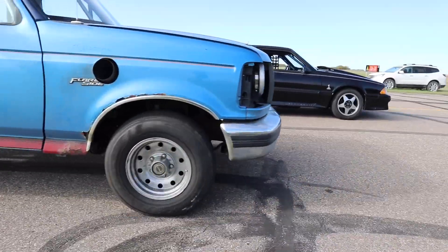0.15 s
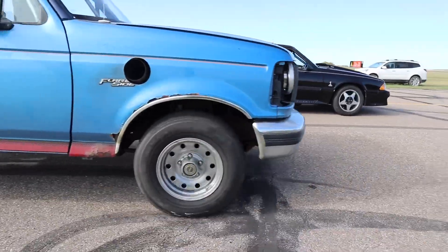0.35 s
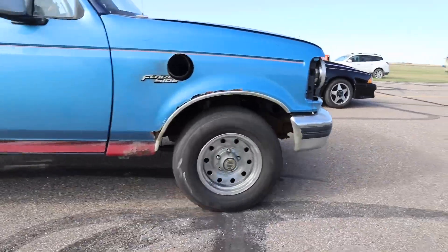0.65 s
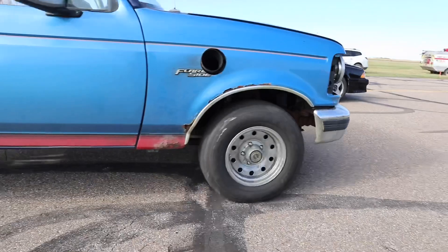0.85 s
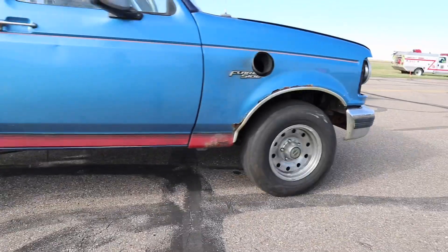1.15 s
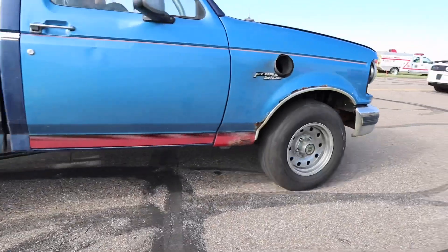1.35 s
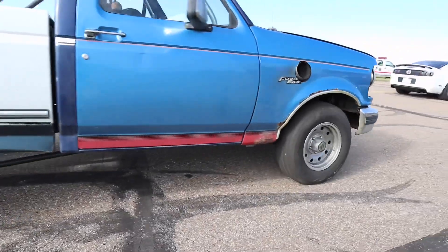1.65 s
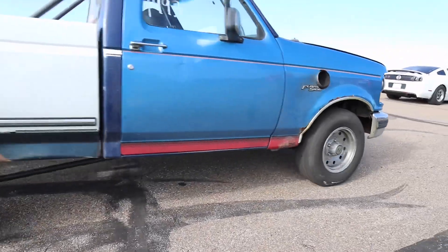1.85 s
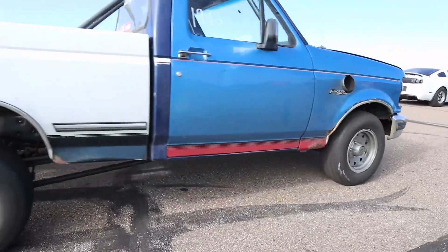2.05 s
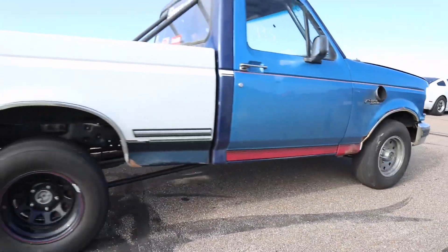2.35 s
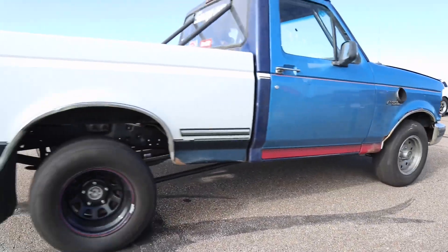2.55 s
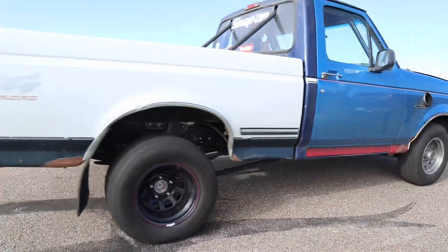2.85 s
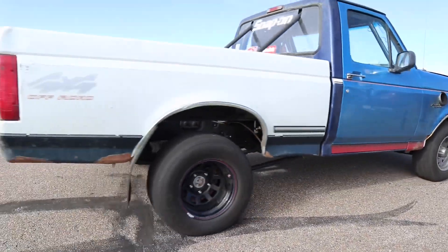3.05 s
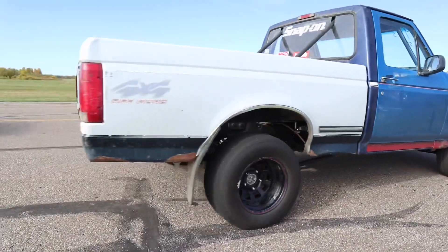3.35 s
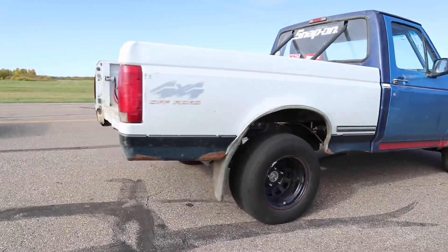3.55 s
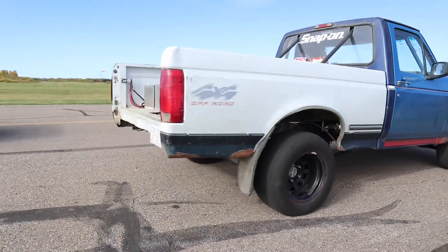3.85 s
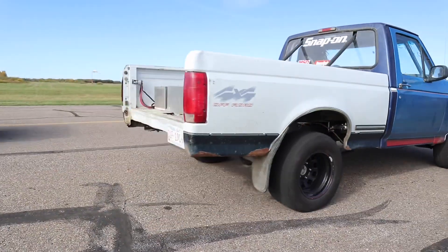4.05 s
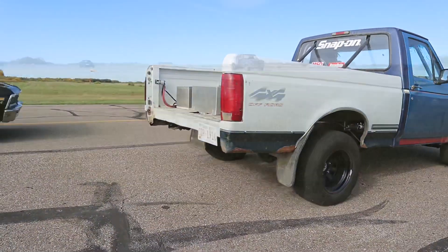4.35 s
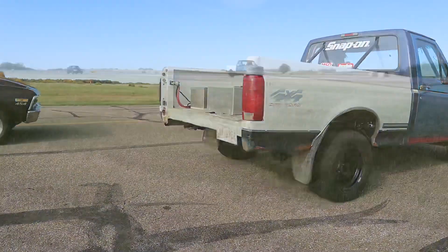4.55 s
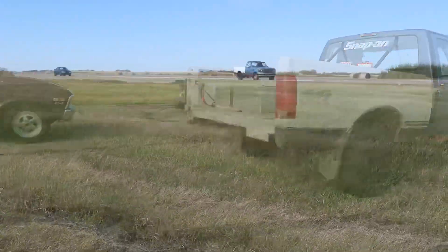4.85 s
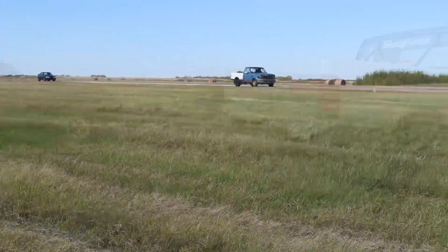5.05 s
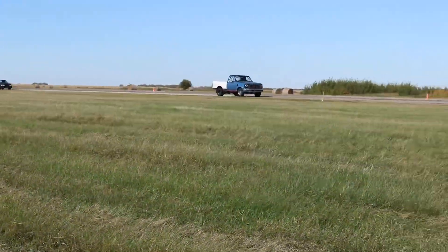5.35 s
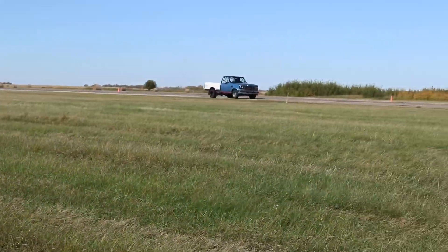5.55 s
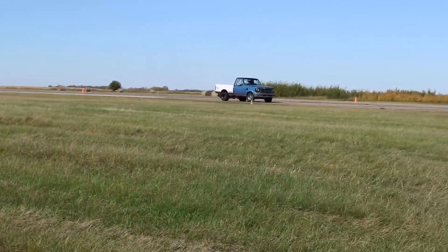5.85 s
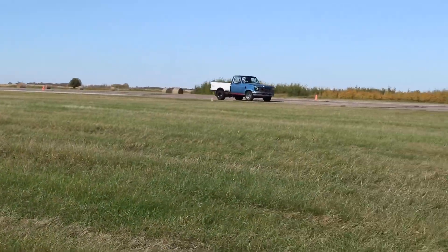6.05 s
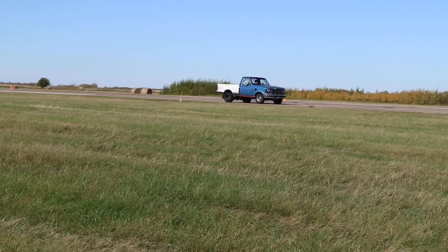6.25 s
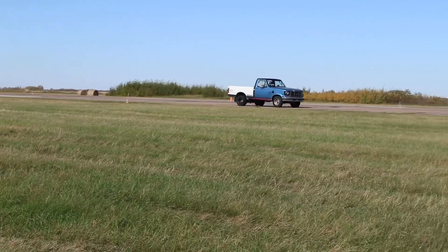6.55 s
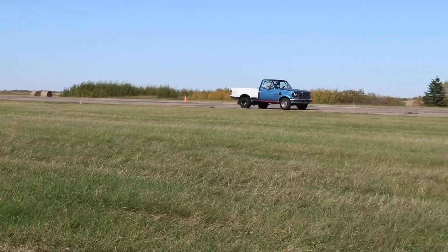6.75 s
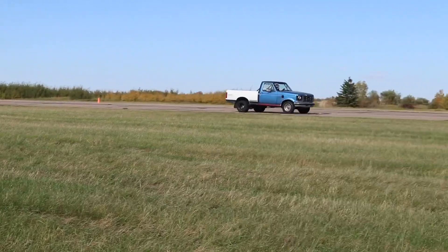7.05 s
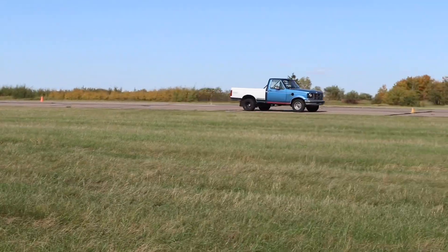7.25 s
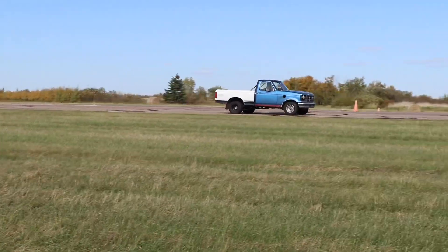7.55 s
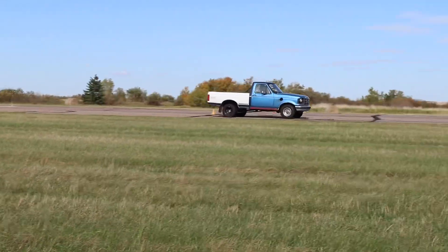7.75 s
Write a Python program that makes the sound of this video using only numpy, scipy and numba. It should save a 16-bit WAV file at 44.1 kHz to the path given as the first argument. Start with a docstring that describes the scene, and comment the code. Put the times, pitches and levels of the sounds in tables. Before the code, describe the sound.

Outdoors on open tarmac, a V8 pickup crawls past the microphone at a lumpy idle, deep exhaust booming and barking over ticking valves and fan hiss. From behind it grows throatier, then briefly labours and sags with a sizzle. The sound crossfades to the truck far away across grass, droning steadily under load and nearing, its rushing treble swelling and sinking while wind buffets and pops the microphone. A few dry cracks snap out.

```python
"""A V8 pickup rolls past close by at a lumpy fast idle: its firings boom and bark, mirrored by the road.
As it rolls away its engine labours briefly and sags, in a swell of open exhaust notes, clatter and sizzle.
The sound fades into the same truck far down the track, pulling hard and coming closer over the grass:
steady exhaust notes drone under a rush of filtered noise whose treble swells and sinks.
Gusts of noise then buffet and pop the microphone; a few sharp cracks stand out from the labouring onwards."""
import sys
import numpy as np
from scipy import signal
from scipy.fft import rfft, irfft, next_fast_len
from scipy.io import wavfile
from scipy.ndimage import uniform_filter1d, map_coordinates
from numba import njit

SR = 44100
rng = np.random.default_rng(int(sys.argv[2]) if len(sys.argv) > 2 else 0)


def master(y):
    """Save y as 16-bit WAV."""
    cut = np.clip(np.atleast_2d(y).T, -1, 1)
    pcm = np.round(cut * 32767)  # scale
    wavfile.write(sys.argv[1], SR, pcm.astype(np.int16))


N = 347939

# engine speed while rolling by, then while pulling: (time [s], engine cycles per second [Hz])
IDLE_SPEED = [(0, 9.48), (.75, 9.48), (1, 8.93), (1.3, 8.34), (1.8, 8.49), (2.4, 9.18), (2.8, 8.95),
              (3.2, 8.49), (3.6, 8.64), (3.85, 8.38), (4.15, 7.62), (4.5, 7.22)]
PULL_SPEED = [(4.7, 25.65), (5.8, 25.73), (6.1, 25.46), (6.3, 24.7), (6.42, 24.5), (6.62, 24.3),
              (7.36, 23.9), (7.89, 23.38)]
# exhaust notes at idle, and those of the open pipe mouth: (multiple of the cycle rate, relative level [dB])
IDLE_NOTES = [(5, -7), (6, -36), (7, -32), (8, 2.5), (9, -24), (10, -17), (11, 0), (12, -16), (13, -0.5),
              (14, -10.5), (15, -30), (16, -3.5), (17, -10), (18, -16), (19, -8), (20, -8), (21, -4),
              (22, -29.5), (25, -15.5), (26, -24), (27, -16.5)]
MOUTH_NOTES = [(8, -8), (11, -5), (13, -5.5), (16, 3.5), (17, -8.5), (19, -4), (21, 7.5), (22, -2),
               (24, -4), (27, -3), (29, 0.5), (32, -5.5)]
# exhaust notes of the launch, the nearing truck and its bark: (multiple of the cycle rate, relative level [dB])
LAUNCH_NOTES = [(3, -11.5), (4, -14.5), (5, 2.5), (6, -8.5), (7, -14.5), (8, -11), (9, -21.5), (11, -20.5),
                (12, -28.5)]
ONCOMING_NOTES = [(3, -19), (4, -35), (5, 3), (6, -9), (7, -5), (8, -0.5), (9, 0), (10, -20), (11, -7),
                  (12, -26), (13, -12.5)]
ONCOMING_BARK_NOTES = [(19, -16), (21, -12.5), (22, -4), (23, -21.5), (26, -7), (27, -2), (28, -4.5),
                       (29, -3), (30, -10), (31, -1.5), (32, -1), (33, -2.5), (34, -8), (36, -11), (37, -7),
                       (38, -7), (39, -10.5), (41, -3), (42, -8), (43, -6.5), (46, -12), (47, -8)]
# the eight cylinders at idle, and their barks and growls, bunched by the unequal pipes:
# (place in the cycle [0-1], relative level [dB])
IDLE_FIRINGS = [(.055, 0), (.16, -1), (.3, 0), (.44, -3), (.54, 1), (.68, -2), (.79, -3), (.91, 0)]
IDLE_BARKS = [(.06, -9), (.235, -4), (.3, -6), (.376, 1), (.423, -3), (.625, -2), (.722, -2.5), (.84, -8)]
IDLE_GROWLS = [(.055, -5), (.21, -11), (.375, -6), (.452, 0), (.525, -6), (.63, 0), (.76, -8), (.93, -7)]
# ticks of the valve gear, and the firings under load: (place in the cycle [0-1], relative level [dB])
VALVE_TICKS = [(.02, -5), (.115, 0), (.26, -3), (.39, -1), (.5, -.5), (.635, -5), (.74, 0), (.865, -1)]
PULL_FIRINGS = [(.037, -9), (.2, -6), (.367, -7), (.495, -3), (.578, -1), (.773, 0), (.815, -7), (.93, -12)]
# firings that bark harder than the rest: (time [s], peak level [dB])
HARD_BARKS = [(2.574, -15), (3.154, -20), (3.2, -25), (3.289, -10), (3.506, -16), (3.639, -15),
              (3.668, -18), (3.907, -17), (4.427, -22)]
# tone colours of the near truck: (frequency [Hz], relative level [dB])
BOOM_PIPE = [(45, -6.5), (64, -6), (78, -3.5), (100, -3), (120, 2.5), (150, -3.5), (180, 0.5), (200, -7),
             (260, 6)]
THUD_COLOUR = [(25, -32), (45, -29), (65, 7.5), (100, -18), (130, 2), (175, 4.5), (250, -3), (330, -8.5),
               (450, -13.5), (900, -88.5), (4000, -120)]
IDLE_PIPE = [(100, -73.5), (250, -5), (450, -8), (620, -2.5), (740, 1.5), (830, 4.5), (910, -11),
             (1000, -26.5), (1110, -7), (1270, -32.5), (1500, -33), (2000, -35.5), (8000, -100)]
TAIL_PIPE = [(250, -21), (500, -9), (700, 1), (830, 1.5), (950, -0.5), (1080, -6.5), (1200, -10),
             (1400, -9), (1700, -10.5), (3000, -49.5)]
CLATTER_COLOUR = [(200, -29), (800, 11), (1200, -1), (1500, 1), (1800, 1.5), (2700, 6), (3400, -0.5),
                  (3900, -13), (5500, -7.5), (8000, -19.5), (14000, -61)]
FAN_COLOUR = [(500, -55), (2500, -3.5), (4000, 0.5), (6300, 2.5), (8000, 0), (10000, -1), (12300, -1.5),
              (13500, -23), (15000, -31)]
LOW_SPREAD_COLOUR = [(50, -30.5), (110, -18), (200, 1), (330, -12), (450, -10), (900, -82)]
SIZZLE_COLOUR = [(1200, -0.5), (2000, -0.5), (4000, -0.5), (6000, -3.5), (7500, -17), (11000, -23.0),
                 (15000, -45)]
# tone colours of the far truck: (frequency [Hz], relative level [dB])
PULL_PIPE = [(100, -65), (300, -43), (450, 0), (580, -17), (670, -2.5), (760, 4.5), (840, -15.5),
             (900, 4.5), (1000, -12.5), (1130, -28), (1300, -24), (2200, -32), (4000, -66.5), (12000, -100)]
RUSH_COLOUR = [(300, -4.5), (800, 9), (1400, 2.5), (2000, 0), (2800, -7), (3400, 1.5), (4000, -12.5),
               (5200, -10.5), (7500, -30), (12000, -45), (14000, -78)]
FAR_HISS_COLOUR = [(800, -45), (2500, -21), (3500, 3.5), (5200, 4), (8000, 1), (10000, -2.5), (12200, -8.5),
                   (13500, -41), (15000, -52)]
THIN_ROUGH_COLOUR = [(30, -56), (70, -31), (120, -2), (200, 8.5), (300, -6.0), (450, -18), (900, -75)]
# tone colours of the wind and the cracks: (frequency [Hz], relative level [dB])
GUST_COLOUR = [(60, -23.5), (150, -6), (300, -0.5), (480, -2), (700, -9), (1000, -19.5), (1600, -35.5),
               (4000, -62), (14000, -101)]
RUMBLE_COLOUR = [(15, 4), (40, -9.5), (90, 7), (160, 4), (300, -4.5), (800, -71), (4000, -120)]
CRACK_COLOUR = [(500, -28), (1000, -2), (1300, 6), (1700, 6.5), (2200, 4), (2750, 4), (3500, -4.5),
                (4300, -10), (5500, -10), (8000, -19.5), (13000, -43)]
# moving air carries swells of treble from the far truck: (time [s], half length [s],
# rush gain [dB], hiss gain [dB], centre of the rush [Hz])
SWELLS = [(5.308, 0.16, 0.5, 1.5, 2070), (5.505, 0.025, -1.5, 1, 2720), (5.651, 0.012, -0.5, 4, 3300),
          (6.195, 0.19, 10, -2.5, 2540), (6.764, 0.023, 0.5, -3, 3100), (6.883, 0.099, -1, -1, 2210),
          (7.043, 0.027, 1.5, 4, 3370), (7.101, 0.03, 2.5, 8.5, 2780), (7.187, 0.067, -3, 1.5, 2360),
          (7.352, 0.038, 6, 7, 3080), (7.578, 0.045, 3.5, 2, 2990), (7.685, 0.029, 2.5, -4, 2750),
          (7.786, 0.042, 5, 9.5, 2860)]
# wind buffets: (time [s], sputter level [dB], length [s], rumble level [dB])
BUFFETS = [(5.511, -33.5, 0.028, -14.5), (5.541, -32, 0.037, -18.5), (5.658, -23, 0.017, -13.5),
           (5.708, -23, 0.014, -15.5), (5.72, -22, 0.019, -19.5), (5.745, -30, 0.028, -17.5),
           (5.863, -24, 0.031, -22.5), (5.907, -25.5, 0.015, -51), (5.93, -28, 0.06, -26.5),
           (5.968, -41, 0.0092, -33), (6.039, -27, 0.19, -60), (6.29, -32, 0.1, -49),
           (6.529, -27, 0.0035, -50), (7.753, -17.5, 0.031, -64), (7.803, -20, 0.014, -46),
           (7.826, -18.5, 0.038, -40)]
# pops of wind on the microphone: (time [s], peak level [dB])
POPS = [(5.668, -19), (5.707, -20), (5.742, -12), (5.874, -29), (5.907, -17), (5.952, -12.5),
        (5.993, -17.5), (6.065, -19), (6.528, -21.5)]
# sharp cracks: (time [s], peak level [dB], lean to the right [share of the middle])
CRACKS = [(4.198, -30, .3), (5.154, -22.5, 1), (7.012, -9, 0.21)]

CRACK_ECHO_S, CRACK_ECHO_DB = .00085, -6  # delay and level of a crack's reflection
# rolling by: the engine and its side pipe pass the microphone at walking pace
ROLL_M_S, ROLL_PASSES_S, ROLL_GAP_M = 1.357, 0.78, 1.652
FAN_PASSES_S, FAN_GAP_M = 1.07, 1.32  # the grille comes by a little after the pipe
PIPE_HEIGHT_M, MIC_HEIGHT_M = 0.881, 1.069
SOUND_M_S, BAY_MIRROR = 343, .33  # speed of sound; share of the clatter that the road reflects
TICK_HISS = .85  # steady hiss mixed with the valve ticks, whose rms is 1
# levels with the engine alongside, then what they gain once the truck is heard from behind
BOOM_DB, THUD_DB, BARK_DB, BODY_DB, CLATTER_DB, FAN_DB = -19, -28, -31.5, -27, -33, -34
REAR_BOOM_DB, REAR_THUD_DB, REAR_BARK_DB, REAR_BODY_DB, REAR_CLATTER_DB = -5.5, 9.5, 3.5, -4, 3
# the view swings from the truck's side to its tail; the lean to the right shrinks with it
TURN_S, TURN_LENGTH_S, SIDE_LEAN, REAR_LEAN = 3.02, 0.77, 2.19, 0.13
# the growl swells as the open rear wheel arch goes by
GROWL_S, GROWL_LENGTH_S, GROWL_DB = 2.82, 0.52, 3.5
BODY_WIDTH_HZ = 161.  # width of the band that the road reflection lifts
# the engine labours briefly as the truck rolls away, its speed sagging
LABOUR_S, LABOUR_HOLD_S = 4.083, 0.12
MOUTH_DB, SIZZLE_DB, LABOUR_CLATTER_DB = -18.5, -40.5, 2
TAIL_DB, LABOUR_TAIL_DB = -33, 3.5  # rough gas noise heard from behind, and what the load adds
# the run down the track, and its levels if it were abreast of the microphone
RUN_M_S, RUN_PASSES_S, RUN_GAP_M = 33.9, 9.13, 33.3
RUSH_HZ = 2680  # centre of the intake and tyre rush between swells
ONCOMING_DB, PULL_BARK_DB, PULL_RASP_DB, RUSH_DB, HISS_DB = -21.5, -17, -24, -22.5, -31.5
# loss over the grass, in dB per doubling of distance
BOOM_LOSS_DB, BARK_LOSS_DB, RUSH_LOSS_DB, HISS_LOSS_DB = 8.5, 11, 9.5, 14
# the deep launch drone sinks with the dip, then gives way as the bass drops away
LAUNCH_DB, BASS_DROP_S, BASS_DROP_LENGTH_S = -16, 6.0, 0.043
# the truck's level dips at 5.57 s and creeps back
DIP_S, DIP_ATTACK_S, DIP_RECOVERY_S, DIP_DB, DIP_TREBLE_DB = 5.568, 0.24, 1.58, -12.5, -20.5
# the near truck fades out and the far one fades in
FADE_FROM_S, FADE_LENGTH_S, FAR_FROM_S, FAR_LENGTH_S = 4.28, 1, 4.39, 0.76
MIC_CEILING, TOP_HZ = .9, 15500  # share of full scale where peaks round off; upper edge of the treble


def idling_truck():
    """Lumpy firings boom, bark in the pipe and bounce off the road; the engine bay ticks and hisses."""
    hz, = curves(IDLE_SPEED)
    cycles = np.cumsum(hz) / SR
    metres = distance(ROLL_M_S, ROLL_PASSES_S, ROLL_GAP_M)
    spread_db = 20 * np.log10(ROLL_GAP_M / metres)
    # the path by way of the road is longer than the direct one
    road_m = np.hypot(metres, MIC_HEIGHT_M + PIPE_HEIGHT_M)
    direct_m = np.hypot(metres, MIC_HEIGHT_M - PIPE_HEIGHT_M)
    late_s = (road_m - direct_m) / SOUND_M_S
    rear = 1 / (1 + np.exp((TURN_S - np.arange(N) / SR) / TURN_LENGTH_S))  # 0 side view, 1 tail view
    load = labour(rise_s=0.18, fall_s=0.27)
    growl_db = GROWL_DB * bump(GROWL_S, GROWL_LENGTH_S)
    thud_db = THUD_DB + REAR_THUD_DB * rear
    bark_db = BARK_DB + REAR_BARK_DB * rear
    turbulence = .33 + .2 * rear
    pulses = fire(cycles, IDLE_FIRINGS, scatter_db=1.6, jitter_s=.0001)

    boom = exhaust_boom(cycles, rear, load, growl_db)
    thud = colour(puffs(pulses, decay_s=0.055) * noise(), THUD_COLOUR) * undb(thud_db)
    bark = exhaust_bark(cycles, turbulence, late_s, bark_db + 1.1 * growl_db)
    tail = tail_gas(pulses, rear, load)
    body_db = BODY_DB + spread_db + growl_db + REAR_BODY_DB * rear
    body = body_growl(cycles, turbulence, late_s) * undb(body_db)
    clatter_db = CLATTER_DB + spread_db + REAR_CLATTER_DB * rear + LABOUR_CLATTER_DB * load
    bay = engine_bay(cycles, late_s, clatter_db)

    # separate clatter, rough bark and low rumble spread the truck between left and right
    bay_spread = engine_bay(cycles, late_s, clatter_db)
    bark_spread = colour(knocks(cycles, IDLE_BARKS, decay_s=0.0079), IDLE_PIPE) * undb(bark_db - 11)
    low_spread = colour(noise(), LOW_SPREAD_COLOUR) * undb(thud_db - 13.5)
    # above the bass the close truck is much stronger in the right channel
    lean = SIDE_LEAN + (REAR_LEAN - SIDE_LEAN) * rear
    side = 0.11 * boom + 0.14 * thud + lean * (bark + tail + 0.5 * body)
    side = side + (0.5 + .5 * lean) * bay + 1.25 * bay_spread + bark_spread + low_spread
    return stereo(boom + thud + bark + tail + body + bay, side)


def exhaust_boom(cycles, rear, load, growl_db):
    """Low notes locked to the firings; the open pipe mouth adds its own under load and from behind."""
    notes = unit(drone(cycles, IDLE_NOTES, IDLE_FIRINGS, waver_db=1.26, waver_rate=7, pipe=BOOM_PIPE))
    mouth = unit(drone(cycles, MOUTH_NOTES, IDLE_FIRINGS, waver_db=0.8, waver_rate=8.9))
    boom = notes * undb(BOOM_DB + REAR_BOOM_DB * rear + 1.02 * growl_db)
    return boom + mouth * undb(MOUTH_DB) * (load + 0.24 * rear)


def exhaust_bark(cycles, turbulence, late_s, level_db):
    """Blasts of gas ring in the pipe and reflect from the road; a few single firings bark harder."""
    bark = colour(blast(cycles, IDLE_BARKS, turbulence), IDLE_PIPE)
    bark = mirrored(bark, late_s, share=0.27) * undb(level_db)
    return bark + strikes(HARD_BARKS, IDLE_PIPE, decay_s=.0001)


def tail_gas(pulses, rear, load):
    """Rough gas noise, puffing with the firings, comes up as the tail turns to the listener."""
    gas = colour((1 + puffs(pulses, decay_s=0.0059)) * noise(), TAIL_PIPE)
    return gas * rear * undb(TAIL_DB + LABOUR_TAIL_DB * load)


def body_growl(cycles, turbulence, late_s):
    """The band in which direct and reflected sound first add up stands out of the blasts."""
    growl = blast(cycles, IDLE_GROWLS, turbulence)
    for _ in range(2):
        growl = resonance(growl, 1 / late_s, BODY_WIDTH_HZ)
    return unit(growl)


def engine_bay(cycles, late_s, clatter_db):
    """Eight valve ticks a cycle over a hiss: the clatter bounces off the road, the fan and belts are brighter."""
    ticks = rattle(cycles)
    fan_db = FAN_DB + 20 * np.log10(FAN_GAP_M / distance(ROLL_M_S, FAN_PASSES_S, FAN_GAP_M))
    clatter = mirrored(colour(ticks, CLATTER_COLOUR), late_s, BAY_MIRROR)
    clatter = clatter * undb(clatter_db + 1.34 * walk(12))
    return clatter + colour(ticks, FAN_COLOUR) * undb(fan_db + 1.0 * walk(14))


def rattle(cycles):
    """Each tick of the valve gear shakes a different mix of engine parts, over a hiss that wavers; rms 1."""
    out = 0
    for hz in np.geomspace(700, 13000, 9):
        pushes = fire(cycles, VALVE_TICKS, scatter_db=2.4, jitter_s=.0006)
        pushes = uniform_filter1d(pushes, int(.0035 * SR))
        ticks = puffs(pushes, decay_s=.005)
        grains = np.hypot(ticks, TICK_HISS) * noise() * undb(1.5 * walk(7))
        out = out + resonance(grains, hz * (1 + .04 * walk(5)), .22 * hz)
    return unit(out)


def labour(rise_s, fall_s):
    """Load on the idling engine, 0-1: it builds, holds and lets go."""
    age = np.arange(N) / SR - LABOUR_S
    outside = np.maximum(-age / rise_s, (age - LABOUR_HOLD_S) / fall_s)
    return np.exp(-np.maximum(outside, 0))


def sizzle():
    """A short swell of high hiss while the engine labours, leaning left."""
    mid, side = (colour(noise(), SIZZLE_COLOUR) for _ in range(2))
    hiss = stereo(1.44 * mid, 3.1 * side - 0.64 * mid)
    return hiss * undb(SIZZLE_DB) * labour(rise_s=0.14, fall_s=0.48)


def pulling_truck():
    """Under load the exhaust notes are a throbbing drone, then more bark and rush as the truck nears."""
    hz, = curves(PULL_SPEED)
    cycles = np.cumsum(hz) / SR
    far = np.log2(distance(RUN_M_S, RUN_PASSES_S, RUN_GAP_M) / RUN_GAP_M)  # doublings of distance
    dip = ramp(DIP_S, DIP_ATTACK_S) - ramp(DIP_S + DIP_ATTACK_S, DIP_RECOVERY_S)
    boom, bark = pulling_boom(cycles, far), pulling_bark(cycles, far)
    treble, treble_side = rush_and_hiss(cycles, far, dip)
    return stereo((boom + bark) * undb(DIP_DB * dip) + treble, treble_side)


def pulling_boom(cycles, far):
    """A deep drone holds until the bass drops away; then thinner low notes grow with nearness."""
    rough = colour(noise(), THUD_COLOUR) * undb(-15.5)
    thin_rough = colour(noise(), THIN_ROUGH_COLOUR) * undb(-0.5)
    launch_notes = drone(cycles, LAUNCH_NOTES, PULL_FIRINGS, waver_db=1.0, waver_rate=4.77)
    launch = (launch_notes + rough) * undb(LAUNCH_DB)
    low_notes = drone(cycles, ONCOMING_NOTES, PULL_FIRINGS, waver_db=.7, waver_rate=4)
    oncoming = (low_notes + thin_rough) * undb(ONCOMING_DB - BOOM_LOSS_DB * far)
    return launch + (oncoming - launch) * ramp(BASS_DROP_S, BASS_DROP_LENGTH_S)


def pulling_bark(cycles, far):
    """High exhaust notes with a rasp of ringing pipe and turbulent gas."""
    pulses = fire(cycles, PULL_FIRINGS, scatter_db=1.5, jitter_s=.00008)
    notes = unit(drone(cycles, ONCOMING_BARK_NOTES, PULL_FIRINGS, waver_db=1.7, waver_rate=3))
    gas = puffs(pulses, decay_s=.004) * noise()
    rasp = colour(knocks(cycles, PULL_FIRINGS, decay_s=.005) + .7 * gas, PULL_PIPE)
    return (notes * undb(PULL_BARK_DB) + rasp * undb(PULL_RASP_DB)) * undb(-BARK_LOSS_DB * far)


def rush_and_hiss(cycles, far, dip):
    """Moving air between truck and listener makes the treble swell, sink and change colour."""
    rush_db = RUSH_DB - RUSH_LOSS_DB * far + DIP_TREBLE_DB * dip
    hiss_db = HISS_DB - HISS_LOSS_DB * far + DIP_DB * dip
    rush_hz = RUSH_HZ
    for s, length, rush_gain_db, hiss_gain_db, centre_hz in SWELLS:
        carried = bump(s, length)
        rush_db = rush_db + rush_gain_db * carried
        hiss_db = hiss_db + hiss_gain_db * carried
        rush_hz = rush_hz + (centre_hz - rush_hz) * carried
    pulses = fire(cycles, PULL_FIRINGS, scatter_db=1.5, jitter_s=.00008)
    flow = unit(.85 + .5 * puffs(pulses, decay_s=.0035))
    broad = colour(noise(), RUSH_COLOUR) * undb(-3 + 1.2 * walk(20))
    swell = unit(resonance(colour(noise(), RUSH_COLOUR), rush_hz, 520.)) * undb(.5 + 1.6 * walk(27))
    rush = (broad + swell) * flow * undb(rush_db)
    path_s = 1 / rush_hz  # the ground path lifts the multiples of the rush's centre too
    hiss, hiss_side = (mirrored(colour(noise(), FAR_HISS_COLOUR), path_s, share=0.2)
                       * flow * undb(hiss_db + 2 * walk(25)) for _ in range(2))
    return rush + hiss, 0.86 * hiss_side


def cracks():
    """Dry snaps close to the microphone, each doubled by a reflection."""
    out = 0
    for s, db, lean in CRACKS:
        pair = [(s, db), (s + CRACK_ECHO_S, db + CRACK_ECHO_DB)]
        snap = strikes(pair, CRACK_COLOUR, decay_s=.00003)
        out = out + stereo(snap, lean * snap)
    return out


def pops():
    """The sharpest eddies pop against the microphone."""
    return strikes(POPS, GUST_COLOUR, decay_s=0.00044)


def wind():
    """Eddies strike the two microphone ports: sputtering bursts over a low rumble."""
    t, out = np.arange(N) / SR, 0
    sputter, sputter_side = (colour(noise() * undb(2.0 * walk(130)), GUST_COLOUR) for _ in range(2))
    rumble, rumble_side = (colour(noise(), RUMBLE_COLOUR) for _ in range(2))
    width = 1 - 0.955 * ramp(BASS_DROP_S, BASS_DROP_LENGTH_S)  # narrows when the bass drops away
    sputter = stereo(sputter, width * sputter_side)
    rumble = stereo(rumble, 0.68 * width * rumble_side)
    for s, db, length, rumble_db in BUFFETS:
        age = np.maximum(t - s, 0) / length
        swell = 2 * age * np.exp(1 - 2 * age)  # a quick rise, then the eddy dies away
        out = out + swell * (undb(db) * sputter + undb(rumble_db) * rumble)
    return out


def fire(cycles, firings, scatter_db, jitter_s):
    """One pulse per listed firing and cycle, each a little off in time and strength."""
    place, db = np.transpose(firings)
    count = int(cycles[-1])
    chance = rng.standard_normal(((count + 1) * len(place), 2))
    due = (np.arange(count + 1)[:, None] + place).ravel()
    at = np.interp(due, cycles, np.arange(N), left=-N, right=2 * N) + jitter_s * SR * chance[:, 0]
    size = undb(np.tile(db, count + 1) + scatter_db * chance[:, 1])
    inside = (at > 0) & (at < N - 2)
    at, size = at[inside], size[inside]
    # share each pulse between the two nearest samples
    first, late = at.astype(int), at % 1
    return np.bincount(first, size * (1 - late), N) + np.bincount(first + 1, size * late, N)


def puffs(pulses, decay_s):
    """The gas flow that dies away after each pulse; rms 1."""
    return unit(signal.lfilter([1], [1, -np.exp(-1 / (SR * decay_s))], pulses))


def ring(pulses, decay_s):
    """Dense reflections along the pipe and under the body build up and die away, alike after every pulse."""
    t = np.arange(2048) / SR
    shape = np.exp(-t / decay_s) * (1 - np.exp(-2 * t / decay_s))
    return unit(signal.oaconvolve(pulses, rng.standard_normal(len(t)) * shape)[:N])


def knocks(cycles, firings, decay_s, scatter_db=1.0):
    """Every cylinder rings in its own way, and the same way on every cycle; rms 1."""
    out = 0
    for place, db in firings:
        pulses = fire(cycles, [(place, 0)], scatter_db, jitter_s=.00002)
        out = out + undb(db) * ring(pulses, decay_s)
    return unit(out)


def blast(cycles, firings, turbulence):
    """Each firing is a pressure pulse, its reflections and a puff of turbulent gas."""
    pulses = fire(cycles, firings, scatter_db=2.4, jitter_s=.00014)
    gas = (turbulence + .15 * puffs(pulses, decay_s=.005)) * noise()
    return .58 * unit(pulses) + .58 * knocks(cycles, firings, decay_s=.014) + gas


def drone(cycles, notes, firings, waver_db, waver_rate, pipe=None):
    """Exhaust notes timed by the firings; each wavers, and swells as it meets a pipe resonance."""
    place, strength_db = np.transpose(firings)
    hz, out = np.gradient(cycles) * SR, 0
    for k, db in notes:
        k = round(k)
        phase = np.angle(np.sum(undb(strength_db) * np.exp(-2j * np.pi * k * place)))
        lift_db = np.interp(k * hz, *np.transpose(pipe)) if pipe else 0
        level = undb(db + lift_db + waver_db * walk(waver_rate))
        out = out + level * np.cos(2 * np.pi * k * cycles + phase)
    return np.sqrt(2) * out


def strikes(table, points, decay_s):
    """Sudden pushes of air, (time [s], peak level [dB]), heard through a colour; the loudest sets the scale."""
    t, pushes = np.arange(N) / SR, 0
    for s, db in table:
        pushes = pushes + undb(db) * (t >= s) * np.exp(-np.abs(t - s) / decay_s)
    out = colour(pushes, points)
    return out / np.abs(out).max() * undb(max(db for _, db in table))


def mirrored(x, late_s, share):
    """A sound plus its later reflection from the ground, which lifts and dulls evenly spaced pitches."""
    late = map_coordinates(x, [np.arange(N) - late_s * SR], order=1)
    return (x + share * late) / np.hypot(1, share)


def distance(speed, passes_s, gap):
    """Metres to a truck that drives by in a straight line."""
    return np.hypot(gap, speed * (np.arange(N) / SR - passes_s))


@njit
def resonance(x, hz, width):
    """Band-pass whose centre moves."""
    y, band, low = np.empty(len(x)), 0., 0.
    for i in range(len(x)):
        g, k = np.tan(np.pi * hz[i] / SR), width / hz[i]
        v = (band + g * (x[i] - low)) / (1 + g * (g + k))
        band, low, y[i] = 2 * v - band, low + 2 * g * v, k * v
    return y


def colour(x, points):
    """Causal filter through (frequency [Hz], level [dB]) points; the result has rms 1."""
    size = next_fast_len(N + 8192)
    hz, db = np.transpose(points)
    bins_hz = np.arange(size // 2 + 1) * SR / size
    log_gain = np.log(undb(np.interp(np.log(bins_hz + 1), np.log(hz), db)))
    # folding the cepstrum gives the filter that answers soonest (minimum phase)
    cepstrum = irfft(log_gain, size)
    cepstrum[1:size // 2] *= 2
    cepstrum[size // 2 + 1:] = 0
    return unit(irfft(rfft(x, size) * np.exp(rfft(cepstrum)), size)[:N])


def walk(rate):
    """Random levels held 1 / rate seconds and smoothed twice; rms 1."""
    k = int(SR / rate)
    held = noise()[np.arange(N) // k]
    return unit(uniform_filter1d(uniform_filter1d(held, k), k))


def noise():
    """White noise."""
    return rng.standard_normal(N)


def curves(table):
    """Each column after the time as a value per sample."""
    s, *columns = np.transpose(table)
    return [np.interp(np.arange(N) / SR, s, c) for c in columns]


def ramp(start_s, length_s):
    """Rises evenly from 0 to 1."""
    return np.clip((np.arange(N) / SR - start_s) / length_s, 0, 1)


def bump(centre_s, half_length_s):
    """A smooth bell-shaped swell that peaks at 1."""
    return np.exp(-((np.arange(N) / SR - centre_s) / half_length_s) ** 2)


def undb(db):
    """Decibels to gain."""
    return 10 ** (np.asarray(db) / 20)


def unit(x):
    """Scale to rms 1."""
    return x / np.sqrt(np.mean(x ** 2))


def stereo(mid, side):
    """Left and right; side is what the right gains and the left loses."""
    return np.array([mid - side, mid + side])


def scene():
    """The truck near, then far, with wind and cracks."""
    near = (1 - ramp(FADE_FROM_S, FADE_LENGTH_S)) * (idling_truck() + sizzle())
    far = ramp(FAR_FROM_S, FAR_LENGTH_S) * pulling_truck()
    return near + far + wind() + pops() + cracks()


def record(dry):
    """The microphone rounds the strongest peaks, and a steep filter cuts the top of the treble."""
    rounded = dry / (1 + (dry / MIC_CEILING) ** 6) ** (1 / 6)
    return signal.sosfilt(signal.ellip(8, .2, 70, TOP_HZ, fs=SR, output="sos"), rounded)


dry = scene()
out = record(dry)
master(out)
```